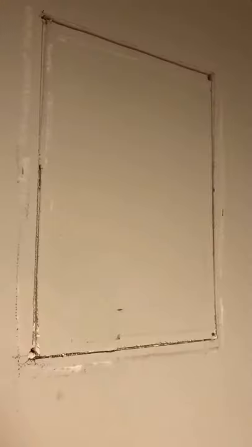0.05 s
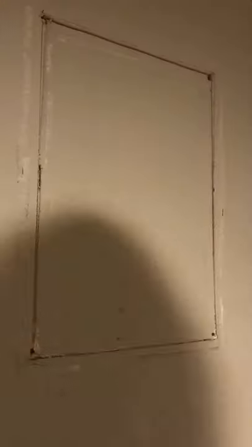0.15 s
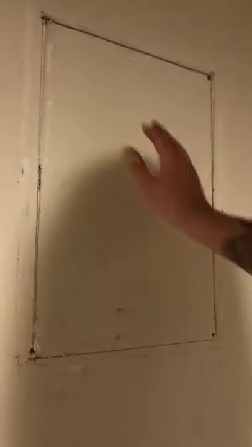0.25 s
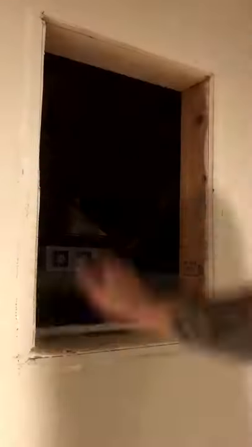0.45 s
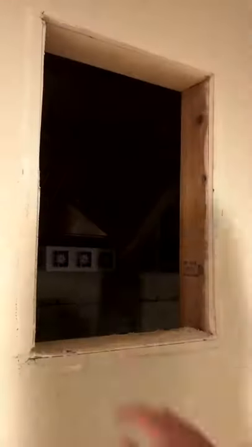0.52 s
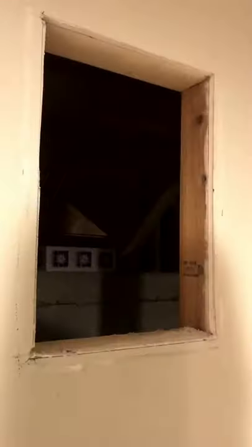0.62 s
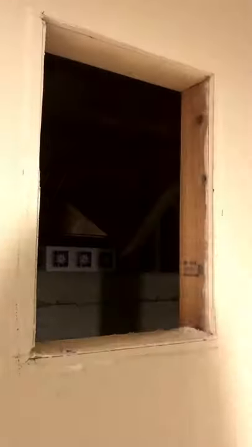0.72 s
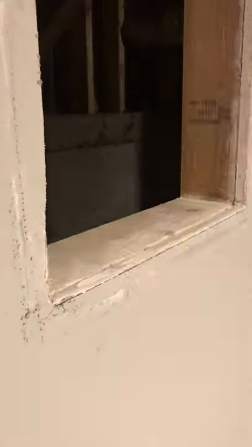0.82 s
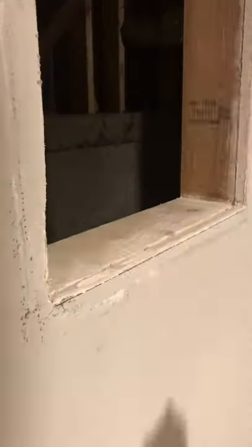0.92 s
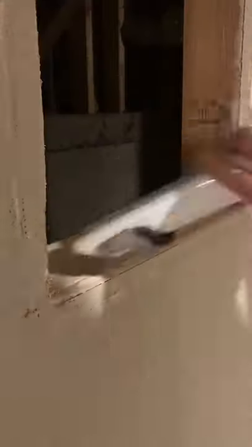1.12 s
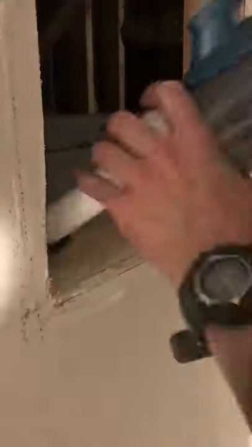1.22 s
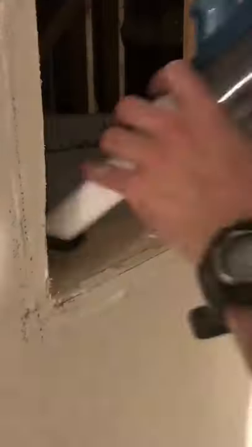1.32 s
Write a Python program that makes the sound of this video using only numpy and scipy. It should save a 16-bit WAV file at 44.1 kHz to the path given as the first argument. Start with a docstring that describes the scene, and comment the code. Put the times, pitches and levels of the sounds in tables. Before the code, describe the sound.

Over a low indoor rumble, a hand smacks a cut wall panel, which knocks loose and falls with a sharp bang. The rumble stops, and a quieter handheld vacuum clicks on, rising to a whine with rushing air.

```python
"""Over a low room rumble, a hand slaps a cut-out plasterboard panel. It flexes, scrapes out of its opening,
knocks on the frame and lands flat with a bang in the room behind. The scene then changes abruptly to a quiet
room. A switch clicks and a small handheld motor, like a vacuum cleaner's, spins up to a steady whine of fan
tones and rushing air, its housing bumping and rubbing as it is moved to the opening."""
import sys
import numpy as np
from scipy import signal
from scipy.fft import rfft, irfft
from scipy.io import wavfile

SR = 44100
rng = np.random.default_rng(int(sys.argv[2]) if len(sys.argv) > 2 else 0)


def inscribe(sig):
    """Save sig as 16-bit PCM at rate SR to the path in sys.argv[1].

    A 1-D sig is mono; a 2-D sig holds one channel per row.
    Samples are clipped to [-1, 1] before scaling.
    """
    pcm = np.round(np.clip(np.atleast_2d(sig).T, -1, 1) * 32767)
    wavfile.write(sys.argv[1], SR, pcm.astype(np.int16))


N = 59535
T = np.arange(N) / SR
BIN_HZ = np.fft.rfftfreq(N, 1 / SR)


def from_db(db):
    """Decibels to gain."""
    return 10 ** (np.asarray(db) / 20)


def unit_rms(x):
    """Scale to an rms of 1."""
    return x / np.sqrt(np.mean(x ** 2) + 1e-20)


def at_hz(table, hz, column=1):
    """Read one column of a table on a log-frequency axis."""
    table = np.array(table)
    return np.interp(np.log(hz + 1e-3), np.log(table[:, 0]), table[:, column])


def coloured(spectrum, source=None):
    """White noise, or another source, through an EQ curve; rms 1, so the curve's levels are relative."""
    source = rng.standard_normal(N) if source is None else source
    return unit_rms(irfft(rfft(source) * from_db(at_hz(spectrum, BIN_HZ)), N))


def uneven_noise(ripple_db, width_hz):
    """Noise with random spectral peaks and dips, shallower below 2 kHz."""
    heights = np.clip(rng.standard_normal(2048), -2, 2)
    ripple = np.interp(BIN_HZ / width_hz, np.arange(len(heights)), heights)
    gain = from_db(ripple_db * ripple * np.clip(BIN_HZ / 2000, 0, 1))
    return irfft(rfft(rng.standard_normal(N)) * gain, N)


def drift(rate_hz):
    """A random modulator of rms 1, rolled off above rate_hz."""
    return unit_rms(irfft(rfft(rng.standard_normal(N)) / (1 + (BIN_HZ / rate_hz) ** 2), N))


def envelope(start, attack, hold, t60):
    """Linear attack, hold, exponential release; times in seconds."""
    age = T - start
    rise = np.clip(age / max(attack, 1e-4), 0, 1)
    return rise * from_db(-60 * np.maximum(age - attack - hold, 0) / t60)


def burst(table, start, attack, hold, source=None):
    """A crowd of close modes: third-octave bands of noise, each dying at its own rate."""
    spectrum = rfft(coloured(table, source))
    edges = np.geomspace(20, 20000, 31)
    sound = np.zeros(N)
    for low, high in zip(edges, edges[1:]):
        band = irfft(spectrum * ((BIN_HZ >= low) & (BIN_HZ < high)), N)
        t60 = at_hz(table, np.sqrt(low * high), column=2)
        sound += band * envelope(start, attack, hold, t60)
    return sound


def ring(modes, start, attack, hold):
    """Distinct modes set ringing by one blow."""
    return sum(from_db(db) * envelope(start, attack, hold, t60)
               * np.sin(2 * np.pi * (hz * (T - start) + rng.random())) for hz, db, t60 in modes)


# Low room bed: f/Hz, level/dB
RUMBLE_EQ = [(40, -48), (100, -19.5), (143, -14), (192, -5), (387, -4), (484, -17.5), (700, -16),
             (890, -11), (1100, -24.5), (1600, -28), (2570, -32.5), (4240, -37.5), (9000, -45),
             (15500, -54.5)]


def room_rumble():
    """The room rumbles, swelling by 2 dB a second."""
    return from_db(-44 + 2 * T) * coloured(RUMBLE_EQ)


# Smack of the palm: f/Hz, level/dB, t60/s
PALM_BANDS = [(40, -25.5, .25), (120, -22.5, 0.21), (230, -0.5, 0.22), (383, -3.5, 0.17), (809, -17, 0.12),
              (1070, -1.5, 0.019), (1700, 1, 0.012), (2130, -25, 0.14), (4750, -22.5, 0.062),
              (15000, -43, 0.14)]
# Ring of the panel held in the wall: f/Hz, level/dB, t60/s
HELD_MODES = [(307, -7, .2), (342, 4.5, 0.036), (424, -15, 0.13), (517, -18.5, 0.22), (595, -19, 0.16),
              (755, -25.5, 0.24), (1075, -20, 0.15)]


def slap(start=.2428):
    """The palm hits the panel and sets it ringing."""
    palm = from_db(-23) * burst(PALM_BANDS, start, attack=.0002, hold=.0025)
    return palm + from_db(-17.5) * ring(HELD_MODES, start, attack=.00056, hold=0)


# Bending note of the panel: t/s, f/Hz, level/dB
FLEX_CURVE = [(.243, 120, -44), (.258, 132, -34), (.285, 148, -41), (.305, 172, -37), (.345, 146, -44),
              (.365, 150, -54), (.40, 166, -48), (.455, 205, -47), (.48, 205, -60)]


def flex():
    """The panel bends as it comes loose, with a low gliding note."""
    times, hz, db = np.transpose(FLEX_CURVE)
    level = from_db(np.interp(T, times, db, left=-200, right=-200))
    phase = 2 * np.pi * np.cumsum(np.interp(T, times, hz)) / SR
    return np.sqrt(2) * level * np.sin(phase)


# Bright, gritty friction: f/Hz, level/dB
GRIT_EQ = [(200, -39), (700, -7), (1600, -12), (2600, -2.5), (5500, 2), (10000, 1.5), (15500, -4)]
# Scrapes along the cut: t/s, level/dB, attack/s, t60/s
SCRAPE_CUES = [(.2452, -27.5, .0005, .014), (.25, -63, .01, 1.5), (.3392, -35, .0005, .014),
               (.336, -52, .014, .12), (.393, -51, .018, .1)]


def scrapes(grains_per_s=6000):
    """The cut edges rub and crumble in a spray of plaster grains."""
    grains = (rng.random(N) < grains_per_s / SR) * rng.standard_normal(N)
    level = sum(from_db(db) * envelope(start, attack, 0, t60) for start, db, attack, t60 in SCRAPE_CUES)
    return level * coloured(GRIT_EQ, grains)


# Panel against frame: f/Hz, level/dB, t60/s
KNOCK_BANDS = [(100, -23.5, .2), (300, -1.5, 0.32), (800, -6.5, 0.11), (1700, -6.5, 0.057),
               (2800, -18.5, .1), (15000, -36.5, .06)]
# Hits on the frame: t/s, level/dB
KNOCK_CUES = [(.36, -43), (.394, -45), (.413, -48)]


def knocks():
    """The panel knocks on the frame as it tips."""
    return sum(from_db(db) * burst(KNOCK_BANDS, start, attack=.0017, hold=.002)
               for start, db in KNOCK_CUES)


# Crack of the flat landing: f/Hz, level/dB, t60/s
BANG_BANDS = [(35, -22.5, .1), (120, -15.5, .13), (300, -9.5, 0.13), (560, -4.5, .15), (700, -2.5, 0.11),
              (860, 2.5, 0.17), (1080, -0.5, .15), (1600, 0.5, 0.13), (2700, -2.5, 0.1), (4550, -1.5, .105),
              (5660, -9, .11), (9250, -9.5, 0.098), (15500, -14, 0.061)]
# Ring of the panel on the floor: f/Hz, level/dB, t60/s
FALLEN_MODES = [(536.4, -2.5, .13), (849, 0.5, 0.24), (901, -5.5, .3), (1223, -2, .08), (1597, -4, 0.067),
                (1826, -11.5, 0.31), (2100, -5, .09), (2652, -1.5, 0.07), (3225, -9, 0.15), (4232, -5, .1),
                (4890, -14.5, 0.027), (8005, -6.5, .08), (8754, -6, .08), (12656, -8.5, 0.073)]
# Reverb of the room behind: f/Hz, level/dB, t60/s
BACK_ROOM_BANDS = [(50, -38, .3), (149, -14.5, 0.44), (400, -5, 0.29), (900, 2, .45), (1990, -5.5, .4),
                   (5000, -13.5, 0.47), (15000, -22.5, 0.39)]


def bang(start=.4812):
    """One edge brushes the floor, then the whole board lands; board and back room ring on."""
    edge = from_db(-43) * burst(BANG_BANDS, start=.477, attack=.003, hold=0)
    crowded_modes = uneven_noise(ripple_db=2.5, width_hz=108.4)
    crash = from_db(-12) * burst(BANG_BANDS, start, attack=.0014, hold=.0105, source=crowded_modes)
    board = from_db(-23.5) * ring(FALLEN_MODES, start, attack=.0069, hold=.0041)
    reverb = from_db(-39.5) * burst(BACK_ROOM_BANDS, start, attack=.03, hold=.015)
    return edge + crash + board + reverb


# Faint room bed: f/Hz, level/dB
QUIET_EQ = [(60, -33), (200, -12.5), (443, -1), (585, -6.5), (720, -10), (2050, -24), (4000, -27),
            (15500, -40)]


def quiet_room():
    """Steady room tone under the machine."""
    return from_db(-70) * coloured(QUIET_EQ)


# Tick of the plastic housing: f/Hz, level/dB, t60/s
TAP_BANDS = [(60, -26, .08), (299, -14, 0.092), (910, 0, 0.084), (2180, 0, 0.054), (4000, -8, 0.043),
             (15000, -23, .04)]
# Touches on the housing: t/s, level/dB
TAP_CUES = [(.719, -66), (1.063, -58), (1.317, -55)]


def taps():
    """Light taps ring briefly in the plastic housing."""
    return sum(from_db(db) * burst(TAP_BANDS, start, attack=.0014, hold=.0014) for start, db in TAP_CUES)


# Snap of the switch, and its tail: f/Hz, level/dB, t60/s
SNAP_BANDS = [(60, -50, .01), (400, -20, .015), (900, -4, 0.015), (1600, -5, .02), (2100, -11, .012),
              (3000, -5, .012), (6000, -1.5, 0.0086), (8500, -4, .008), (10900, 4, .008),
              (15500, -11, 0.0073)]
SNAP_TAIL_BANDS = [(60, -45, .1), (400, -16, .15), (1200, -4, .12), (2000, -10, .12), (3500, -1, 0.19),
                   (7000, -14, 0.23), (11000, -6, .1), (15500, -27, .1)]


def switch(start=.7798):
    """A small plastic snap and its short echo."""
    snap = from_db(-45.5) * burst(SNAP_BANDS, start, attack=.00038, hold=.00056)
    return snap + from_db(-62.5) * burst(SNAP_TAIL_BANDS, start, attack=.002, hold=.014)


# Hiss of the airflow: f/Hz, level/dB
AIR_EQ = [(60, -35), (130, -19), (400, -19), (700, -9), (1300, 10), (2100, -5), (2700, 4.5), (4000, 3),
          (4800, 3.5), (5400, 4.5), (5950, 7), (6600, 7.5), (8000, 2.5), (9700, 1.5), (11400, 11),
          (13300, 0.5), (14700, 6), (15600, 1.5)]


def air_rush(speed):
    """Fluttering air noise that gains 13 dB each time the fan's speed doubles."""
    db = -53 + 13 * np.log2(speed + 1e-6) + 1.2 * drift(rate_hz=45)
    return from_db(db) * coloured(AIR_EQ, uneven_noise(ripple_db=1.5, width_hz=154))


# Fan partials: multiple of the blade tone, level/dB at full speed, slope/dB per doubling of speed
WHINE_PARTIALS = [(1, -62.5, -10.5), (1.5, -72.5, 30), (2, -56.5, 66), (3, -56, 30), (3.5, -62.5, 62),
                  (4, -58, 10), (5, -60.5, 19), (6, -53.5, 22), (6.5, -81, 35), (7, -53, 31),
                  (8, -58.5, 17), (9, -56, 16)]


def whine(blade_hz, speed):
    """The blade tone rises first, overtones join near full speed; all waver as reflections shift."""
    phase = 2 * np.pi * np.cumsum(blade_hz * (1 + .0007 * drift(rate_hz=40))) / SR  # speed jitter
    blade_fade = np.clip((speed - .25) / .58, 0, 1) ** 2
    overtone_fade = np.clip((speed - .666) / .16, 0, 1) ** 2
    octaves = np.log2(speed + 1e-6)
    tones = np.zeros(N)
    for multiple, db, slope in WHINE_PARTIALS:
        reflected_share = .6 * np.sqrt(multiple / WHINE_PARTIALS[-1][0])  # high partials waver most
        sine, cosine = np.sin(multiple * phase), np.cos(multiple * phase)
        direct = np.sqrt(2 - 2 * reflected_share) * sine
        reflected = np.sqrt(reflected_share) * (drift(rate_hz=15) * sine + drift(rate_hz=15) * cosine)
        fade = blade_fade if multiple == 1 else overtone_fade
        tones += fade * from_db(db + slope * octaves) * (direct + reflected)
    return tones


# Spin-up of the blade tone: t/s, f/Hz
BLADE_PITCH = [(.778, 0), (.793, 560), (.81, 961), (.83, 1240), (.85, 1418), (.866, 1510), (.885, 1580),
               (.916, 1645), (.958, 1687), (1.0, 1706), (1.04, 1721), (1.14, 1730), (1.35, 1753)]
# Level ride on the moving machine: t/s, level/dB
SWING_RIDE = [(.8, -1.5), (.86, 1), (.9, -2), (.94, -2), (.975, .5), (1.03, -0.5), (1.14, 0), (1.2, -0.5),
              (1.25, -0.5), (1.35, -2.5)]


def motor():
    """The fan spins up; its level drifts as the machine is swung about."""
    blade_hz = np.interp(T, *np.transpose(BLADE_PITCH))
    speed = blade_hz / blade_hz.max()
    swing = from_db(np.interp(T, *np.transpose(SWING_RIDE)))
    return swing * (whine(blade_hz, speed) + air_rush(speed))


# Soft thud through the housing: f/Hz, level/dB
THUD_EQ = [(50, -30), (100, -15), (200, -7), (310, 0), (420, -1), (520, -12), (1300, -16), (3000, -35)]
# Bumps of the housing: t/s, thud level/dB, rub level/dB, attack/s, t60/s
BUMP_CUES = [(1.061, -66.5, -57, 0.0035, 0.054), (1.09, -63.5, -70, 0.012, 0.27),
             (1.293, -58, -48.5, 0.016, 0.26)]


def bumps():
    """The housing thuds and rubs as it is handled and set against the opening."""
    thud, rub = coloured(THUD_EQ), coloured(GRIT_EQ)
    return sum((from_db(thud_db) * thud + from_db(rub_db) * rub) * envelope(start, attack, 0, t60)
               for start, thud_db, rub_db, attack, t60 in BUMP_CUES)


def scene(change_s=.6865):
    """The scene changes abruptly from the falling panel over its rumble to the machine in a quiet room; mono."""
    panel = slap() + flex() + scrapes() + knocks() + bang() + room_rumble()
    machine = switch() + motor() + bumps() + taps() + quiet_room()
    crossfade = np.clip((T - change_s) / .001, 0, 1)
    return ((1 - crossfade) * panel + crossfade * machine)[None]


def record(dry):
    """Soft clipping rounds the peaks and a steep low-pass trims the highest treble."""
    ceiling, cutoff_hz = .7, 15680
    lowpass = signal.ellip(12, .1, 80, cutoff_hz, fs=SR, output="sos")
    return signal.sosfilt(lowpass, ceiling * np.tanh(dry / ceiling))


dry = scene()
out = record(dry)
inscribe(out)
```